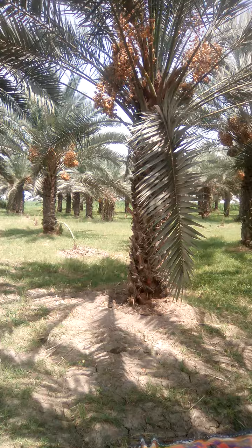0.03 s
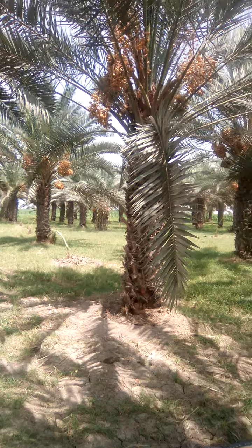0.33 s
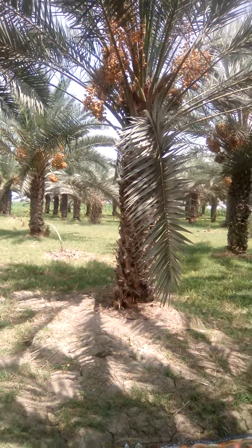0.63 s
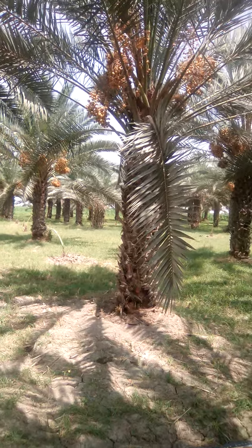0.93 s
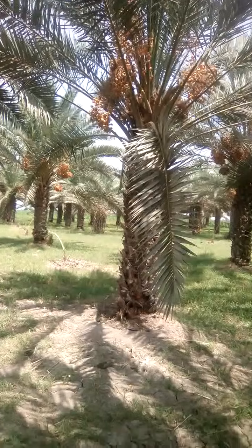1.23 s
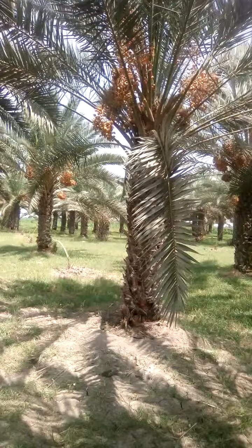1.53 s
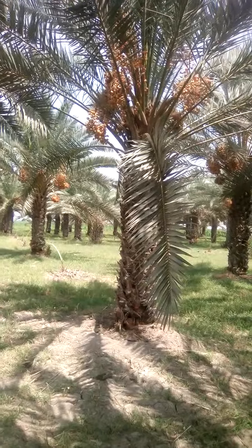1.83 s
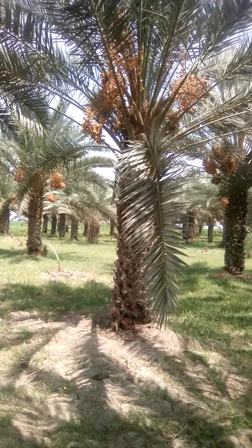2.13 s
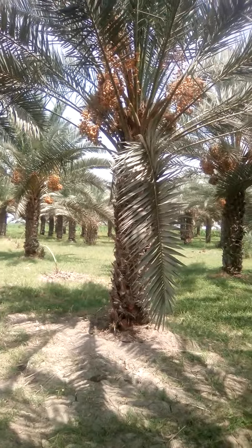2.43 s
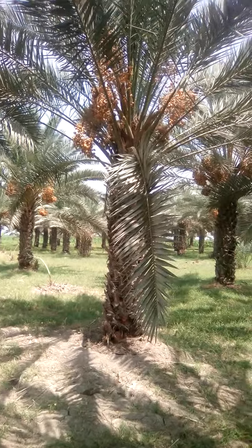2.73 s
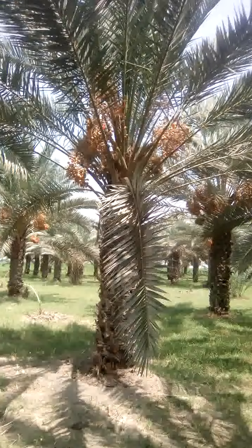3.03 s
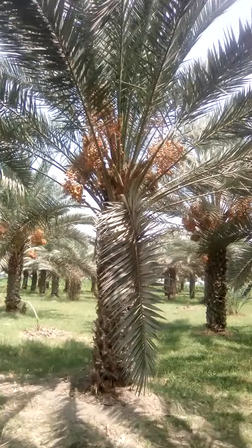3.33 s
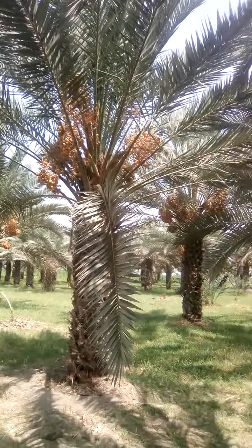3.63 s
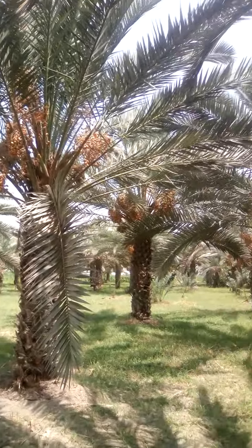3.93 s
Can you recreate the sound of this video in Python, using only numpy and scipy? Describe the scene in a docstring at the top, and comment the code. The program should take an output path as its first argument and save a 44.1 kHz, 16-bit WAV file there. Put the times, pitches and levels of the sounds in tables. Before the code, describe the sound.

A distant engine hums quietly outdoors, with a few soft microphone handling bumps.

```python
"""A quiet palm grove, where a far engine, perhaps a water pump, hums steadily over a soft wash of air.
Its periodic firing gives a harmonic series above a diffuse rumble. Fingers bump and rub the case of
a hand-held camera, and now and then a tick or knock sets the case's damped modes ringing.
The microphone's own hiss and a thin whine lie over it all; the input opens softly at the start."""
import sys
import numpy as np
from scipy import signal
from scipy.fft import rfft, irfft
from scipy.io import wavfile
from scipy.ndimage import uniform_filter1d

SR = 44100
rng = np.random.default_rng(int(sys.argv[2]) if len(sys.argv) > 2 else 0)


def to_wav(s):
    """Save 16-bit WAV."""
    ch = np.atleast_2d(s).T  # columns
    pcm = np.round(np.clip(ch, -1, 1) * 32767)  # PCM
    wavfile.write(sys.argv[1], SR, pcm.astype(np.int16))


N = 176400
TIME = np.arange(N) / SR


def amp(db):
    """Converts decibels to an amplitude ratio."""
    return 10 ** (np.asarray(db) / 20)


def unit_rms(x):
    """Normalises a signal to unit mean power."""
    return x / np.sqrt(np.mean(x ** 2) + 1e-20)


def add(mix, start, sound):
    """Superposition: sums a sound into the mix at a start time in seconds."""
    part = mix[max(round(start * SR), 0):][:len(sound)]
    part += sound[:len(part)]


def coloured(x, spectrum):
    """Spectral shaping by a table read on a log-frequency axis; white noise keeps its power."""
    hz, db = np.transpose(spectrum)
    bins = np.fft.rfftfreq(N, 1 / SR)
    gain = amp(np.interp(np.log(bins + 1), np.log(hz + 1), db))
    return irfft(rfft(x) * unit_rms(gain), N)


def drift(top_hz):
    """Slow sinusoids of random phase sum to a wandering of unit size."""
    rates = np.geomspace(top_hz / 10, top_hz, num=16)
    coarse = TIME[::200]
    cycles = np.outer(coarse, rates) + rng.random(len(rates))
    return np.interp(TIME, coarse, unit_rms(np.sin(2 * np.pi * cycles).sum(1)))


def patchy_noise(spectrum, patchy_db):
    """Random amplitude modulation: coloured noise whose level drifts in patches of time and frequency."""
    cells = signal.stft(rng.standard_normal(N), nperseg=1024, noverlap=768)[2]
    across_frequency = uniform_filter1d(rng.standard_normal(cells.shape), size=9, axis=0)
    patches = unit_rms(uniform_filter1d(across_frequency, size=16, axis=1))
    noise = signal.istft(cells * amp(patchy_db * patches), nperseg=1024, noverlap=768)[1][:N]
    return unit_rms(coloured(noise, spectrum))


# The engine's harmonics. Each row: multiple of the firing rate, base level in dB, wavering in dB.
ENGINE_HARMONICS = [(1, -72, 1.5), (2, -48.8, .4), (3, -61.5, 1.5), (4, -68, 1.5), (5, -66, 1.2),
                    (6, -75.5, 1.5), (7, -80, 1.5), (10, -78, 1), (11, -81, 1.5)]
# The engine's speed. Each row: time in seconds, firing rate in Hz.
FIRING_RATE = [(0, 46.75), (2.3, 46.68), (3.2, 46.75), (3.7, 47.0), (4, 47.0)]
# The engine's swells. Each row: time in seconds, then gains in dB of hum, overtones and rumble.
ENGINE_GAINS = [(.1, -5, -13, -2), (.4, -2.5, -5.5, -4.5), (.85, -3.5, -4, -3), (1.1, -3, 1.5, 0),
                (1.55, -0.5, -1.5, 1), (1.9, 0, -6, 1), (2.25, 0.7, -3.5, -1), (2.9, -2.8, 0.5, -1.5),
                (3.3, -1.5, -0.5, -3), (3.65, -5, 2.5, -1.5), (3.85, 0.5, 2.5, -1.5), (4, -8, 1, -1)]
# The diffuse rumble. Each row: frequency in Hz, relative spectral density in dB.
RUMBLE_SPECTRUM = [(20, -24.5), (60, -7), (82, -13.5), (105, -2), (125, -2.5), (152, 1.5), (175, -11.5),
                   (215, -13.5), (270, -17.5), (340, -20), (450, -22.5), (600, -38), (1500, -50)]


def engine():
    """Periodic firing radiates harmonics, which waver on their way through the grove, over a rumble."""
    firing_hz = np.interp(TIME, *np.transpose(FIRING_RATE)) * (1 + .0015 * drift(top_hz=2.05))
    firings = np.cumsum(firing_hz) / SR
    times, *gains = np.transpose(ENGINE_GAINS)
    hum_db, overtones_db, rumble_db = (np.interp(TIME, times, gain) for gain in gains)
    out = amp(-57 + rumble_db) * patchy_noise(RUMBLE_SPECTRUM, patchy_db=2.2)
    for harmonic, db, waver_db in ENGINE_HARMONICS:
        swell_db = hum_db if harmonic <= 2 else overtones_db
        level = amp(db + swell_db + waver_db * drift(top_hz=2.08))
        out += np.sqrt(2) * level * np.sin(2 * np.pi * (harmonic * firings + rng.random()))
    return out


# Soft bumps on the case. Each row: centre in seconds, envelope peak in dB, frequency in Hz.
CASE_BUMPS = [(0.069, -32, 109), (0.239, -36.5, 81), (0.325, -42, 81), (0.55, -51, 100), (.582, -35.5, 130),
              (.94, -45, 65), (3.1096, -27, 162), (3.128, -26.5, 52.6), (3.130, -30, 153),
              (3.141, -29.5, 51.6), (3.154, -28, 110), (3.171, -35, 78.5), (3.749, -31.5, 73)]


def bumps(half_width_cycles=0.51):
    """Heavy damping: each bump is a single low swing of the case, in and out."""
    out = np.zeros(N)
    for centre, db, hz in CASE_BUMPS:
        t = np.arange(-2 / hz, 2 / hz, 1 / SR)
        envelope = amp(db) * np.exp(-(t * hz / half_width_cycles) ** 2)
        add(out, centre + t[0], envelope * np.sin(2 * np.pi * hz * t))
    return out


# Finger strokes. Each row: start in seconds, length in seconds, level in dB before the case filters it,
# share of the length spent rising, bass gain in dB.
FINGER_STROKES = [(0.062, 0.029, -44.5, 0.49, 5.5), (0.204, 0.036, -48, 0.28, 2),
                  (0.539, 0.046, -44, .4, 5), (.565, 0.11, -39.5, 0.25, 2), (0.708, 0.072, -55.5, .4, 2),
                  (0.898, 0.062, -59, 0.26, 2), (1.661, 0.018, -54, 0.26, -12),
                  (2.877, 0.013, -62, 0.34, -7), (3.06, 0.052, -62, 0.37, 4),
                  (3.101, 0.034, -47.5, 0.21, 7.5), (3.12, 0.023, -37.5, 0.67, 1.5),
                  (3.139, 0.011, -37.5, 0.42, 5), (3.736, 0.02, -46, 0.22, -3),
                  (3.762, 0.078, -60, 0.32, 5)]
# The colour of rubbing heard through the case. Each row: frequency in Hz, relative gain in dB.
CASE_RESPONSE = [(20, -32), (80, 7.5), (190, 0), (330, -3), (560, -7), (800, -9.5), (1300, -10.5),
                 (1850, -11), (2600, -21), (4200, -28), (7000, -43.5), (16000, -69)]


def rubs(slips_per_s=2700, slip_spread_db=6.1, bass_edge_hz=620):
    """Stick-slip friction: skin moves over the case in dense tiny jerks that swell with each stroke."""
    slip_sizes = rng.standard_normal(N) * amp(slip_spread_db * np.minimum(rng.exponential(1, N), 2))
    slips = slip_sizes * (rng.random(N) < slips_per_s / SR)
    smooth_sliding = 0.94 * rng.standard_normal(N)
    friction = unit_rms(unit_rms(slips) + smooth_sliding)
    bass = signal.sosfiltfilt(signal.butter(2, bass_edge_hz, fs=SR, output="sos"), friction)
    out = np.zeros(N)
    for start, length, db, rise, bass_db in FINGER_STROKES:
        pressure = amp(db) * np.interp((TIME - start) / length, [0, rise, 1], [0, 1, 0])
        out += pressure * (friction + (amp(bass_db) - 1) * bass)  # a firmer finger adds weight
    return coloured(out, CASE_RESPONSE)


# Sharp ticks and hollow knocks on the case. Each row: start in seconds, level in dB.
CASE_TICKS = [(.6305, -55), (1.666, -54), (3.1075, -44), (3.1105, -38), (3.1135, -42)]
CASE_KNOCKS = [(.2178, -38), (3.1055, -36), (3.7405, -43.5)]
# The modes each excites. Each row: frequency in Hz, relative level in dB, seconds to decay by 60 dB.
TICK_RESONANCES = [(1940, -11, 0.023), (2940, -1.5, 0.0095), (3450, -7, 0.022), (5100, -4.5, 0.0061),
                   (6170, -7, 0.0069)]
KNOCK_RESONANCES = [(290, -1.5, .05), (527, -2, 0.027)]


def taps(hits, modes, attack_s=0.00063):
    """Free vibration: an impact excites the modes of the case, and each decays exponentially."""
    t = np.arange(SR // 20) / SR
    ring = sum(amp(db - 60 * t / t60) * np.sin(2 * np.pi * hz * t) for hz, db, t60 in modes)
    onset = 1 - np.exp(-t / attack_s)
    out = np.zeros(N)
    for start, db in hits:
        add(out, start, amp(db) * onset * ring)
    return out


# The distant outdoor wash. Each row: frequency in Hz, relative spectral density in dB.
AIR_SPECTRUM = [(20, -23.5), (300, -1.5), (550, 0), (900, -3.5), (1200, -4), (2000, -7.5), (4000, -16.5),
                (8000, -18.5), (16000, -49)]


def air():
    """Ambient noise: the open grove gives a soft, gently fluctuating broadband wash."""
    return amp(-68.5) * patchy_noise(AIR_SPECTRUM, patchy_db=1.27)


def scene():
    """Linear superposition of the engine, the handling and the air in one channel."""
    mix = engine() + bumps() + rubs()
    mix += taps(CASE_TICKS, TICK_RESONANCES) + taps(CASE_KNOCKS, KNOCK_RESONANCES)
    return (mix + air())[None]


# The microphone's hiss. Each row: frequency in Hz, relative spectral density in dB.
HISS_SPECTRUM = [(20, -6), (2000, -0.5), (4000, 0.1), (6500, -0.8), (7300, -9.5), (8200, -18), (13000, -12),
                 (14000, -16), (14800, -0.5), (15600, -2)]
# The electronic whine. Each row: frequency in Hz, rms level in dB.
WHINE_TONES = [(6448.4, -85), (12896.9, -94)]


def record(dry):
    """Self-noise adds hiss and whine; the input gain ramps open and a low-pass filter limits the band."""
    hiss = amp(-65) * coloured(rng.standard_normal(N), HISS_SPECTRUM)
    whine = np.sqrt(2) * sum(amp(db) * np.sin(2 * np.pi * hz * TIME) for hz, db in WHINE_TONES)
    input_gain = np.interp(TIME, [.057, .067, .327], [0, .12, 1])
    low_pass = signal.firwin(511, cutoff=15600, window=("kaiser", 9), fs=SR)
    return signal.oaconvolve((dry + hiss + whine) * input_gain, low_pass[None], "same")


dry = scene()
out = record(dry)
to_wav(out)
```